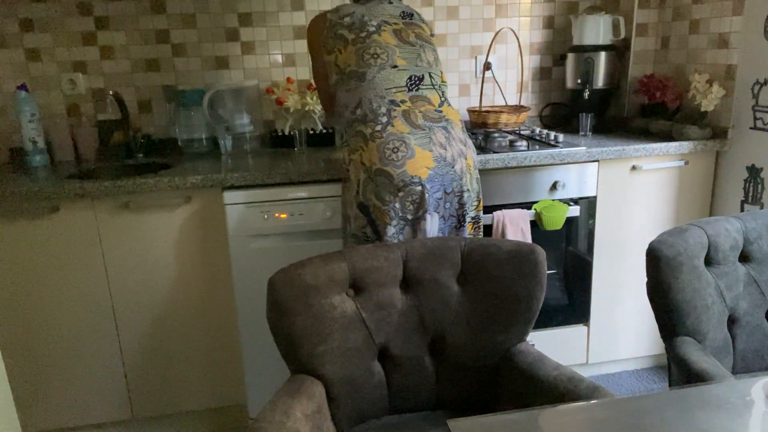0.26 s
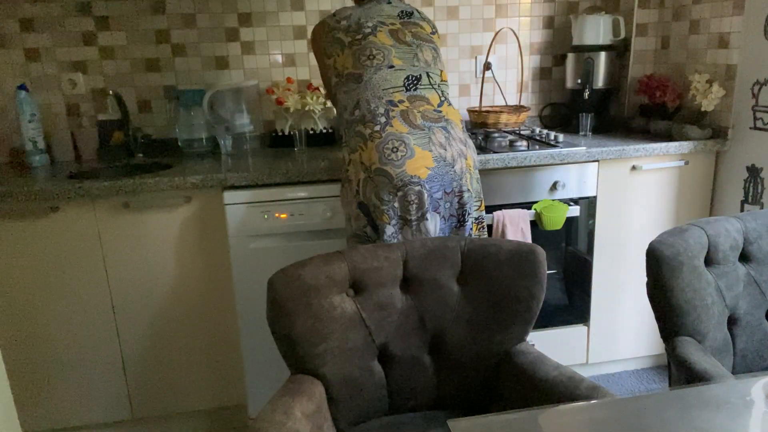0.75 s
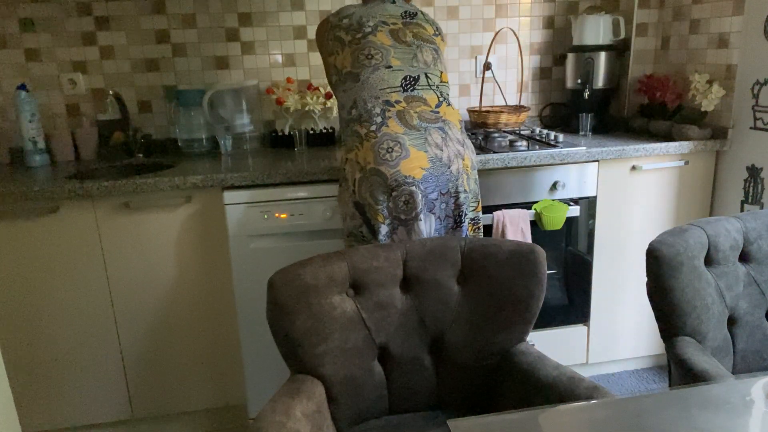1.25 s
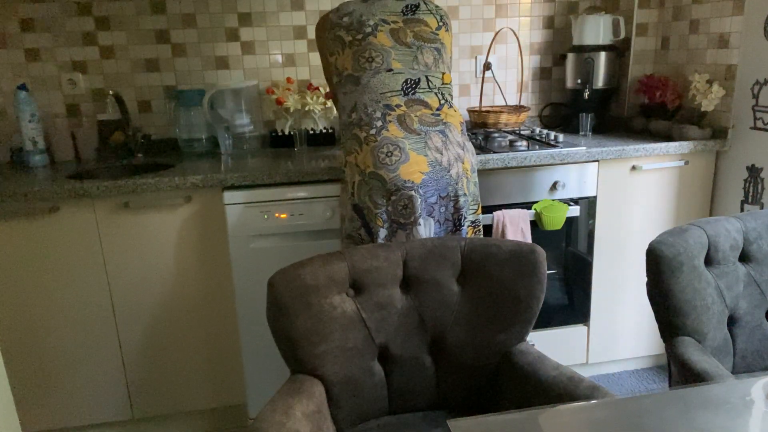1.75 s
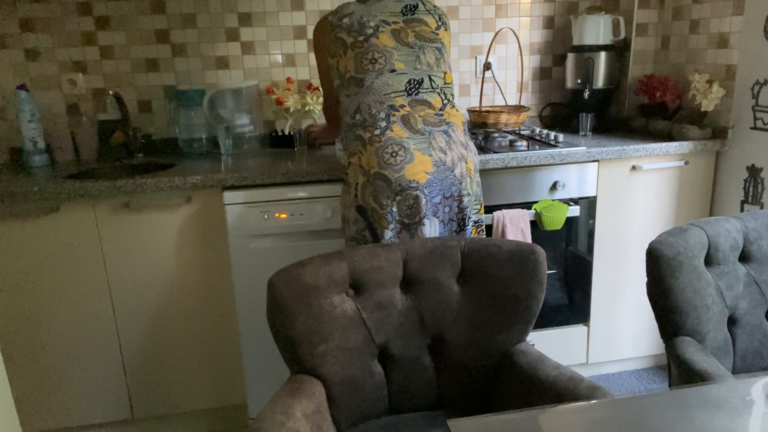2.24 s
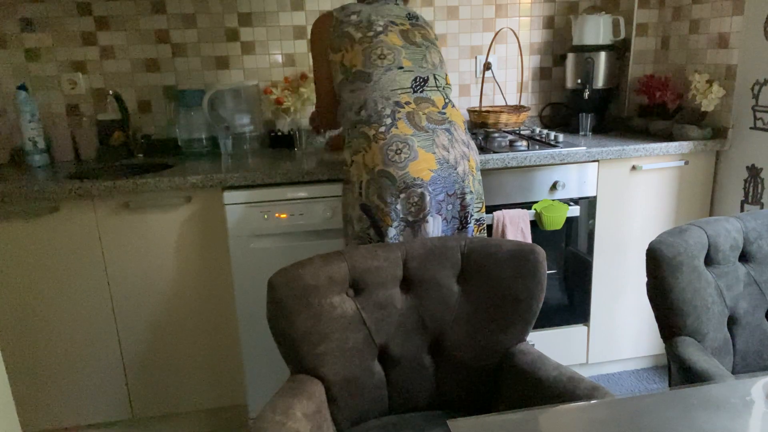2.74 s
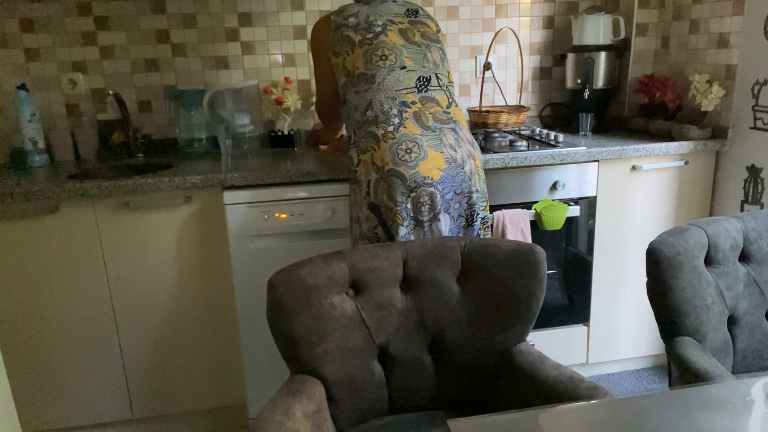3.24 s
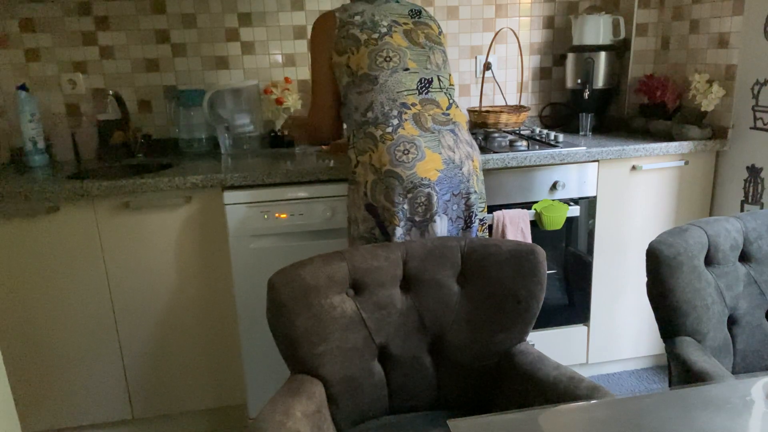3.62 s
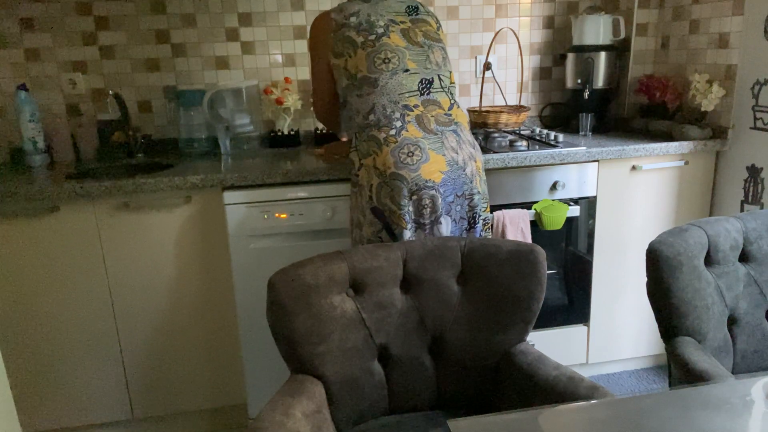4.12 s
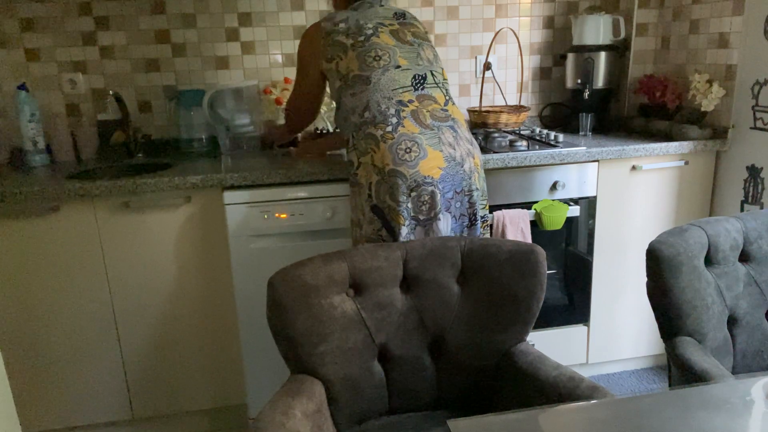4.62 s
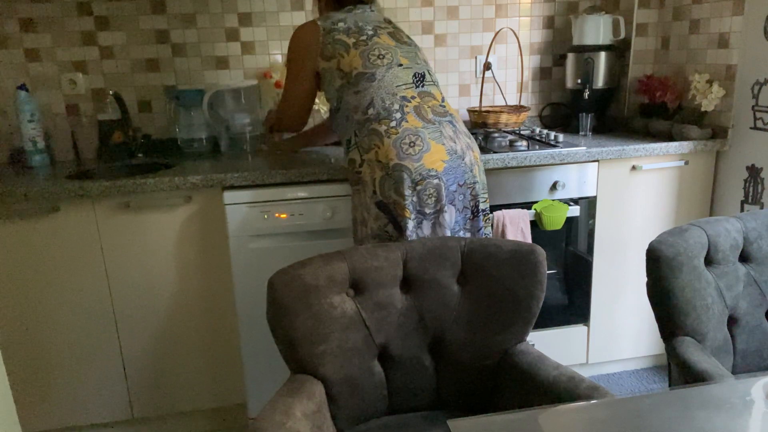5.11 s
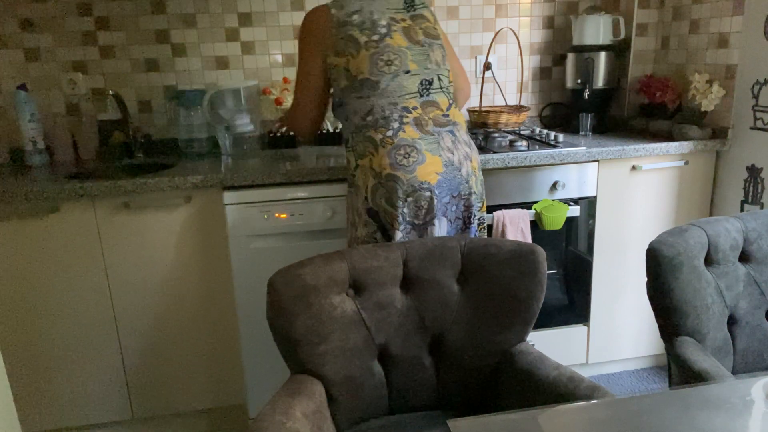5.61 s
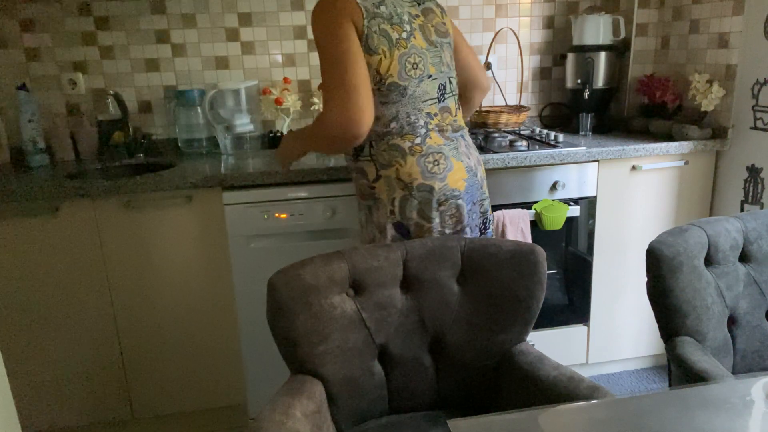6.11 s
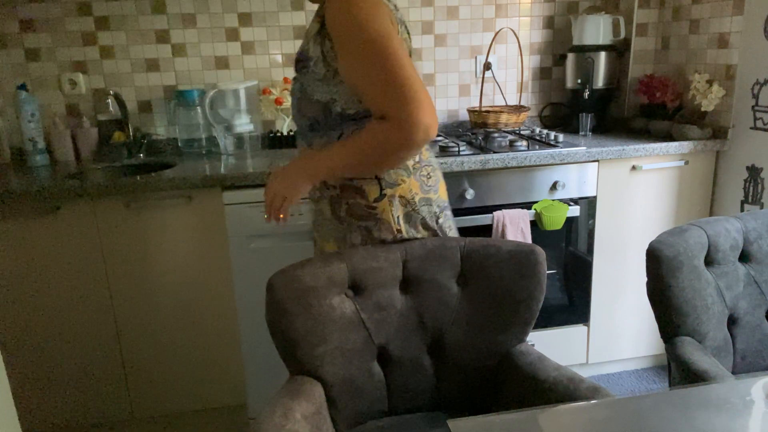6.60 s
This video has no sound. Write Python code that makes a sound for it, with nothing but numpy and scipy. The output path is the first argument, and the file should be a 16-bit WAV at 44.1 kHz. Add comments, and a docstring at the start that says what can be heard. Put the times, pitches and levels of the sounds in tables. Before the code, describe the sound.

In a tiled kitchen, the fading tail of an earlier bang gives way to a quick burst of hard board knocks. A tray and bowl are shifted with lighter clatters, then a plate clacks down loudest, and later a dish lands with small rattles. Faint cloth rustle and low appliance hum continue. Distant stereo pickup, very roomy.

```python
"""Across a tiled kitchen the dying room tail of an earlier bang opens the scene; a board is knocked on a stone
worktop, then a tray and a bowl are shifted and set down. A plate clacks down hard just after four seconds, and a
dish follows; each rings briefly, as decaying modes, with a click-like crack and a dull cabinet thud, heard mostly
through the echoing room. Below, noise and motor tones of a dishwasher and a fridge drone on; cloth and hands rustle
as faint noise; a faint narrow band of noise near 3.1 kHz swells early and again after the plate.
Two spaced microphones, the left nearer the worktop."""
import sys
import numpy as np
from scipy import signal
from scipy.fft import rfft, irfft, next_fast_len
from scipy.io import wavfile
from scipy.ndimage import uniform_filter1d

SR = 44100
rng = np.random.default_rng(int(sys.argv[2]) if len(sys.argv) > 2 else 0)


def generate_wav(sig):
    """Save sig (samples, or channels by samples) to the path in sys.argv[1] as 16-bit PCM at SR."""
    pcm = np.round(np.clip(np.atleast_2d(sig).T, -1, 1) * 32767).astype(np.int16)
    wavfile.write(sys.argv[1], SR, pcm)


N = 303011

# contacts on the worktop: start_s [s], level_db [dB], ring_tilt [dB per octave],
# crack_db [dB against level_db], crack_tilt [dB per octave]
CONTACTS = [(0.007, -26.5, 14.5, 12, -1), (0.185, -11, 4.5, 5.5, 2.5), (0.21, -22, -3, 4, 0.1),
            (0.284, -12.5, 2, 7.5, 0.9), (0.31, -23.5, -2, -10, 14), (0.494, -22.5, -7.5, 5.5, -1),
            (0.659, -26.5, -1.5, -20, -4), (0.848, -31, -2, -15, 2), (0.906, -47.5, 19.5, 17.5, 5.5),
            (1.106, -36, 8, -4, -16), (1.404, -49.5, -9, 16.5, 4.5), (1.576, -30.5, -6, -10, 0.1),
            (1.61, -53, -15, -16, -3), (1.719, -26.5, -2.5, 14.5, -6.5), (1.767, -27.5, -2.5, 2, -0.5),
            (1.806, -22, 2.5, 12.5, -1.5), (1.838, -34, -3, 4, -5), (1.878, -28.5, -3.2, 18.5, -5),
            (1.909, -36, -2, -4, -3), (1.966, -35, -3, -17, -1), (2.01, -53, -8, -4, -4),
            (2.649, -39.5, -1.5, 5.5, 8), (2.719, -52, 2, 18, 10), (3.193, -21.5, -1.5, 13.5, 0),
            (3.251, -25.5, 4, -1, 7), (3.276, -26, -5.5, 22.5, 0.3), (3.3, -48, 6, -1, 6),
            (3.749, -47, 1, 24, -3), (4.137, -7.5, 2, 10.5, 7.5), (5.279, -13.5, 1, 5.5, 0),
            (5.341, -25, -1, 25, -5), (5.371, -33.5, -6.5, -15, 4), (5.418, -36.5, 9.5, 22.5, -5.5),
            (5.499, -33, -3.5, 19, -7), (5.53, -54, -13, 9, -2), (5.838, -61.5, 4.5, 24, 4),
            (5.949, -58.5, -11, 21, 3.5)]
# modes of each thing in hand: pitch_hz [Hz], relative level_db before tilt and scatter [dB],
# t60_s before the hand's limit [s]
BOARD_MODES = [(314, -6.5, 0.074), (409, -4, 0.099), (489, 0.5, 0.029), (623, 4.5, 0.028), (850, 2, 0.014),
               (925, -2.5, 0.036), (1210, -9.5, 0.0081), (1866, -27, 0.082), (2310, -29, 0.016),
               (3270, -62, 0.013)]
TRAY_MODES = [(329.4, 2.5, 0.025), (411, 4, 0.03), (646, 9.5, 0.014), (763, 1.5, 0.11), (936, 7.5, 0.02),
              (1160, -4, 0.046), (1265, -3, 0.034), (1740, 1.5, 0.0075), (1950, -2.5, 0.025),
              (2800, -18, 0.0086), (2990, -11.5, 0.012), (3946, -23.5, 0.054)]
BOWL_MODES = [(337, 3.5, 0.042), (540, 1, 0.05), (701, 8, 0.046), (927, 9, 0.023), (1180, -11, 0.053),
              (1475, 2, 0.022), (1980, -0.5, 0.023), (2120, -13, 0.068), (2890, -17, 0.017),
              (4570, -27, 0.016)]
PLATE_MODES = [(230, -9, .06), (350, -4, .06), (522, -5, .06), (646, -4, .06), (931, -3, .04),
               (1145, 0, .07), (1170, -6, .07), (1240, -8, .14), (1384, -10, .03), (1766, -11, .03),
               (2260, -16, .02), (2606, -12, .03), (3140, -11, .025), (3500, -9, .012), (3755, -11, .03),
               (3778, -11, .13), (4200, -10, .015), (4760, -14, .015), (5145, -18, .02)]
DISH_MODES = [(322, 2.5, 0.034), (409, 2, 0.059), (460, -3.5, 0.03), (680, -8, 0.077), (875, 3, 0.095),
              (1080, -19, 0.057), (1080, -7.5, 0.018), (1543, -4, 0.039), (1578, -5, 0.046),
              (2006, -2.5, 0.022), (2630, -14.5, 0.023), (3620, -31, 0.019)]
# when the tray, bowl, plate and dish take over from the board: start_s [s]
TAKEOVER_S = [1.3, 2.3, 3.6, 4.5]
# longest ring the hand allows, for board, tray, bowl, plate, dish: t60_s [s]
HAND_LIMIT_S = [0.044, 0.065, .07, .25, 0.064]
# colour of the crack before tilt: pitch_hz [Hz], relative level_db [dB]
CRACK_COLOUR = [(300, 6.5), (1000, 12), (1800, 11.5), (2700, 4.5), (3600, -3.5), (5000, -7.5),
                (9000, -17.5), (13000, -31), (16000, -55)]
# treble change of the crack, reached in full at 11 kHz, for board, tray, bowl, plate, dish: level_db [dB]
CRACK_TREBLE_DB = [6, 4, 4.5, -14, 8.5]
# thud modes of the cabinet under the worktop: pitch_hz [Hz], t60_s [s]
CABINET_MODES = [(145, 0.32), (210, 0.086)]
# decay of the kitchen: pitch_hz [Hz], t60_s [s]
ROOM_DECAY = [(150, 0.19), (500, 0.34), (2000, 0.33), (4000, 0.31), (8000, 0.27), (15000, 0.043)]
# likeness of left and right microphone: pitch_hz [Hz], likeness [0 to 1]
MIC_LIKENESS = [(30, 1), (125, 0.82), (400, 0.42), (1000, 0.28), (5000, 0.18), (9000, 0.23)]
# colours of cloth and hands, appliance drone and room wash: pitch_hz [Hz], relative level_db [dB]
RUSTLE_COLOUR = [(1500, -23), (2500, 4), (3200, 3), (5000, -1.5), (8500, -2.5), (13000, -9), (15000, -4),
                 (16500, -41)]
DRONE_COLOUR = [(15, -39.5), (25, -15), (54, -4.5), (113, 2), (163, -5.5), (249, -7), (302, -2), (345, -8),
                (450, -12.5), (580, -51), (990, -120)]
WASH_COLOUR = [(210, -30), (350, -10.5), (386, -7), (541, -6), (740, -5.5), (955, -11.5), (1330, -13.5),
               (2500, -27.5), (3250, -64.5), (5500, -120)]
# levels of the same three through time; drone and wash open on the room tail of an earlier bang:
# start_s [s], level_db [dB]
RUSTLE_CURVE = [(0, -70), (.15, -61), (.45, -71.5), (1.4, -72), (1.7, -66.5), (2.1, -77), (2.43, -74.5),
                (2.7, -66), (2.93, -72.5), (3.14, -70.5), (3.6, -78), (4.45, -72.5), (4.95, -70),
                (5.18, -73.5), (5.27, -61.5), (5.6, -71), (6.05, -69), (6.3, -76.5), (6.43, -73.5),
                (6.6, -64), (6.87, -63)]
DRONE_CURVE = [(0, -33), (.15, -47), (.9, -47), (2.3, -50), (6.87, -51)]
WASH_CURVE = [(0, -37), (.15, -50), (.45, -54.5), (.78, -48.5), (1.4, -53), (2.77, -54), (3.5, -57.5),
              (4.45, -56.5), (5.27, -55.5), (6.87, -54)]
# motor tones: pitch_hz [Hz], rms pitch wander_hz [Hz], level_db before the common lift [dB]
MOTOR_TONES = [(61.6, 8.4, -54), (120, 2.6, -54), (192.6, 3.55, -61), (233, 2, -61), (297, 1.5, -60),
               (376, 2.86, -66.5), (750, 8, -70)]
# swells of the narrow band of noise: middle_s [s], half_length_s [s], level_db [dB]
NARROW_SWELLS = [(.72, 0.58, -71.5), (4.63, .13, -78)]

SCATTER_DB = 1.5  # each contact strikes the modes a little differently
THUD_DB = -25  # cabinet's answer, against each contact's level
FIRST_THUD_S, FIRST_THUD_DB = 0.0084, -27.5  # the first knock's extra heavy, dull thud
DIRECT_DB, FIRST_ECHO_S = -7, 0.004  # direct sound against all echoes; time in which echoes build
EARLY_DB, EARLY_S = -0.5, 0.042  # strength and fading time of the near echoes
RIGHT_LAG_SAMPLES = 12  # the worktop is nearer the left microphone
MOTOR_LIFT_DB, MOTOR_WAVER_DB = 2.5, 1.7  # common lift and rms level waver
NARROW_HZ, NARROW_WIDTH_HZ = 3100, 150
CUTOFF_HZ = 16300


def cabinet_thud(t):
    """The cabinet's low modes swell over some 12 ms, then die away."""
    modes = sum(from_db(-60 * t / t60) * np.sin(2 * np.pi * hz * t) for hz, t60 in CABINET_MODES)
    return modes * (1 - np.exp(-t / 0.012))


def ring(t, held, tilt):
    """A struck thing rings as a sum of decaying modes, damped by the hand that holds it."""
    modes = [BOARD_MODES, TRAY_MODES, BOWL_MODES, PLATE_MODES, DISH_MODES][held]
    hz, db, t60 = np.transpose(modes)[:, :, None]
    scatter = SCATTER_DB * rng.standard_normal((len(hz), 1))
    db = db + tilt * np.log2(hz / 800) + scatter
    signs = (-1) ** np.arange(len(hz))[:, None]
    dying = from_db(db - 60 * t / np.minimum(t60, HAND_LIMIT_S[held]))
    return np.sum(signs * dying * np.sin(2 * np.pi * hz * t), axis=0)


def crack(t, held, tilt):
    """The hard contact is one coloured click, scaled to peak 1."""
    def colour(hz):
        treble = CRACK_TREBLE_DB[held] * np.clip(hz / 5000 - 1.2, 0, 1)
        return from_db(at_hz(CRACK_COLOUR, hz) + tilt * np.log2((hz + 300) / 3300) + treble)

    click = 1.0 * (np.arange(len(t)) == SR // 1000)  # a millisecond into the contact
    click = coloured(click, colour) * (t < 0.25)  # drops what wraps round to the end
    return click / click.max()


def knocks():
    """Each contact excites the modes of the thing in hand, a short crack and a thud of the cabinet."""
    size = SR // 2
    t, out = np.arange(size) / SR, np.zeros(N + size)
    no_bass = signal.butter(2, 260, "high", fs=SR, output="sos")  # small things radiate no bass
    thud = cabinet_thud(t)
    first_at = round(FIRST_THUD_S * SR)
    out[first_at:first_at + size] += from_db(FIRST_THUD_DB) * thud
    for start_s, level_db, ring_tilt, crack_db, crack_tilt in CONTACTS:
        held = np.searchsorted(TAKEOVER_S, start_s)
        contact = ring(t, held, ring_tilt) + from_db(crack_db) * crack(t, held, crack_tilt)
        contact = signal.sosfilt(no_bass, contact)
        at = round(start_s * SR)
        out[at:at + size] += from_db(level_db) * (contact + from_db(THUD_DB) * thud)
    return out[:N]


def kitchen(x):
    """Direct sound, then strong echoes off worktop and tiles that die away band by band."""
    size = int(0.7 * SR)
    t, noise, echoes = np.arange(size) / SR, stereo_noise(size), 0
    for centre_hz in 60 * 2.0 ** np.arange(9):  # overlapping octave bands add up to a flat whole
        def octave(hz):
            distance = np.clip(np.log2((hz + 1) / centre_hz), -1, 1)
            return np.cos(np.pi / 2 * distance) ** 2

        echoes = echoes + coloured(noise, octave) * from_db(-60 * t / at_hz(ROOM_DECAY, centre_hz))
    build_up = 1 - np.exp(-(t / FIRST_ECHO_S) ** 2)
    near = 1 + from_db(EARLY_DB) * np.exp(-t / EARLY_S)
    echoes = echoes * build_up * near
    # many overlapping room modes: no broad band stands out
    crowd = uniform_filter1d(np.abs(rfft(echoes)) ** 2, size=40)
    echoes = irfft(rfft(echoes) / np.sqrt(crowd), size)
    echoes = echoes * (t < 0.6) * (1 - np.exp(-t / 0.002))
    echoes = echoes / np.sqrt(np.sum(echoes ** 2) / 2)  # unit energy per microphone on average
    echoes[[0, 1], [0, RIGHT_LAG_SAMPLES]] += from_db(DIRECT_DB)
    return signal.fftconvolve(x[None], echoes, axes=1)[:, :N]


def rustle():
    """Cloth and hands: treble noise whose level follows a curve and wavers slightly."""
    return from_db(in_time(RUSTLE_CURVE) + 0.39 * drift(6)) * steady_noise(RUSTLE_COLOUR)


def low_drone():
    """Low noise, first the tail of an earlier bang, then dishwasher and fridge, with motor tones on top."""
    return from_db(in_time(DRONE_CURVE)) * steady_noise(DRONE_COLOUR) + motor_hum()


def motor_hum():
    """Motor tones, alike at both microphones, whose pitch and level waver."""
    t, out = np.arange(N) / SR, 0
    for pitch_hz, wander_hz, level_db in MOTOR_TONES:
        turns = pitch_hz * t + np.cumsum(wander_hz * drift(5.61)) / SR
        level = from_db(level_db + MOTOR_LIFT_DB + MOTOR_WAVER_DB * drift(2.0))
        out = out + level * np.sin(2 * np.pi * turns)
    return out


def room_wash():
    """Mid-range noise of the room under a level curve that opens on the tail of an earlier bang."""
    return from_db(in_time(WASH_CURVE)) * steady_noise(WASH_COLOUR)


def narrow_noise():
    """A faint narrow band of noise near 3.1 kHz that swells and fades smoothly."""
    t = np.arange(N) / SR

    def band(hz):
        return 1 / (1 + ((hz - NARROW_HZ) / NARROW_WIDTH_HZ) ** 2)

    narrow = rms_one(coloured(stereo_noise(next_fast_len(N)), band))[:, :N]
    swell = sum(from_db(db) * np.exp(-((t - middle) / half) ** 2) for middle, half, db in NARROW_SWELLS)
    return swell * narrow


def steady_noise(colour):
    """Steady stereo noise of a given colour, rms 1."""
    noise = stereo_noise(next_fast_len(N))
    return rms_one(coloured(noise, lambda hz: from_db(at_hz(colour, hz))))[:, :N]


def stereo_noise(size):
    """White noise at two spaced microphones, partly alike at each pitch and later on the right."""
    def alike(hz):
        return np.clip(at_hz(MIC_LIKENESS, hz), 0, 1)

    mid, side = rng.standard_normal((2, size))
    mid = coloured(mid, lambda hz: np.sqrt((1 + alike(hz)) / 2))
    side = coloured(side, lambda hz: np.sqrt((1 - alike(hz)) / 2))
    return np.array([mid + side, np.roll(mid - side, RIGHT_LAG_SAMPLES)])


def drift(rate_hz):
    """Slow random wander of rms 1, weakening above rate_hz."""
    noise = rng.standard_normal(next_fast_len(N))
    return rms_one(coloured(noise, lambda hz: 1 / (1 + (hz / rate_hz) ** 2)))[:N]


def coloured(x, gain):
    """x through a gain given as a function of Hz."""
    size = x.shape[-1]
    return irfft(rfft(x) * gain(np.fft.rfftfreq(size, 1 / SR)), size)


def at_hz(points, hz):
    """A table read on a log-frequency axis."""
    table_hz, values = np.transpose(points)
    return np.interp(np.log(hz + 1), np.log(table_hz), values)


def in_time(curve):
    """A level curve read at every sample."""
    return np.interp(np.arange(N) / SR, *np.transpose(curve))


def from_db(db):
    """Amplitude gain of a level in dB."""
    return 10 ** (np.asarray(db) / 20)


def rms_one(x):
    """x scaled to rms 1."""
    return x / np.sqrt(np.mean(x ** 2) + 1e-20)


def scene():
    """Knocks heard through the kitchen, over rustle, drone, wash and a narrow band of noise."""
    return kitchen(knocks()) + rustle() + low_drone() + room_wash() + narrow_noise()


def record(dry):
    """The microphones lose the deepest bass; the treble has a gap near 10 kHz; the top is cut."""
    no_rumble = signal.sosfilt(signal.butter(2, 40, "high", fs=SR, output="sos"), dry)
    gap = signal.sosfilt(signal.butter(4, [9500, 11300], "bandstop", fs=SR, output="sos"), no_rumble)
    soft = signal.sosfilt(signal.butter(6, 14300, fs=SR, output="sos"), gap)
    return signal.sosfilt(signal.cheby2(12, 70, CUTOFF_HZ, fs=SR, output="sos"), soft)


dry = scene()
out = record(dry)
generate_wav(out)
```